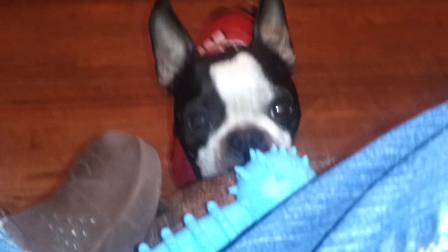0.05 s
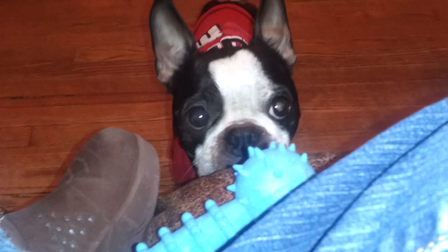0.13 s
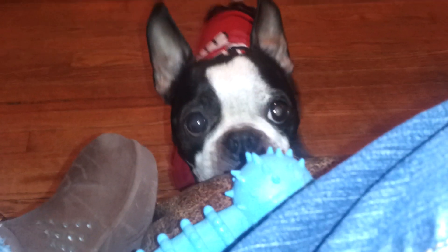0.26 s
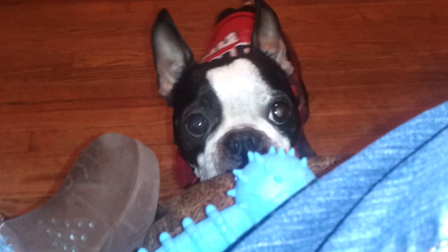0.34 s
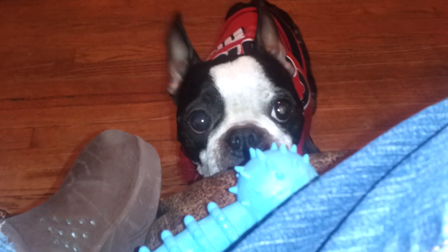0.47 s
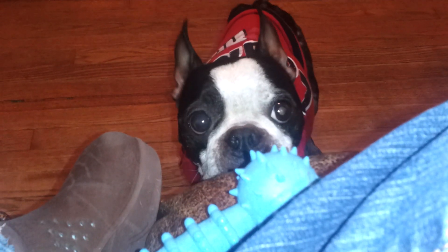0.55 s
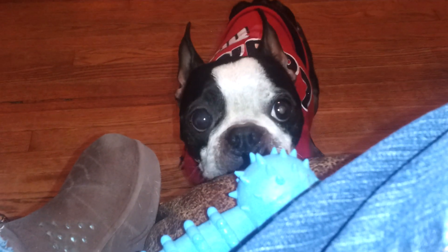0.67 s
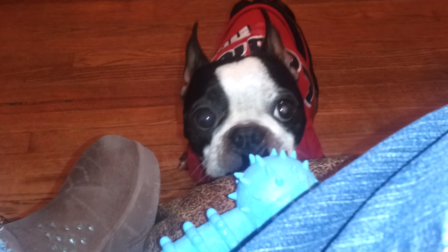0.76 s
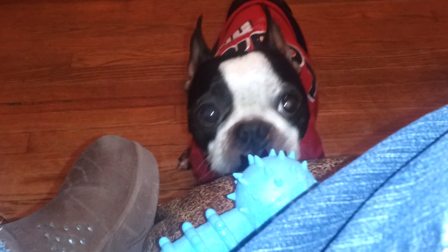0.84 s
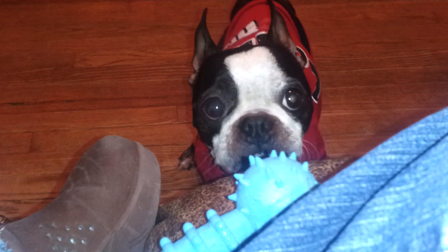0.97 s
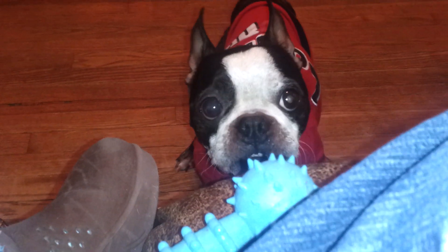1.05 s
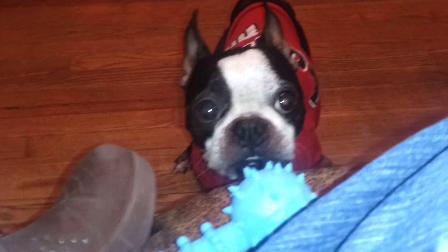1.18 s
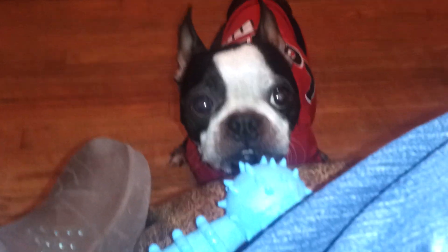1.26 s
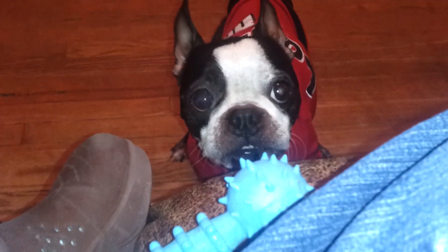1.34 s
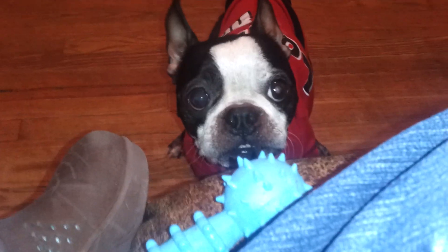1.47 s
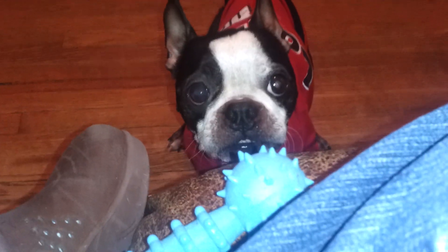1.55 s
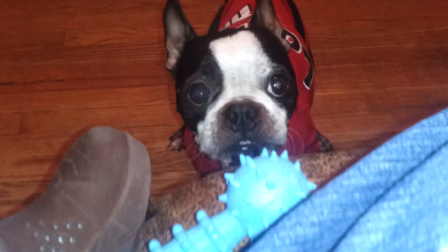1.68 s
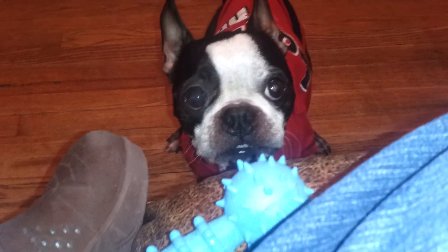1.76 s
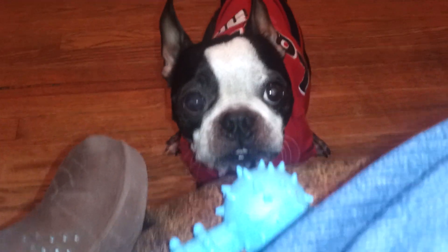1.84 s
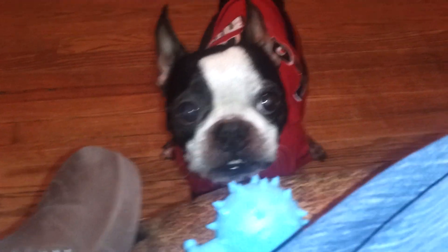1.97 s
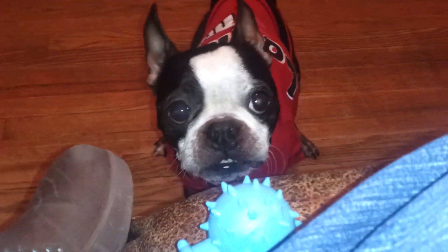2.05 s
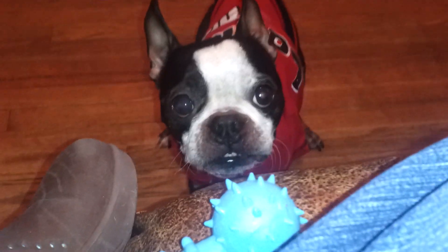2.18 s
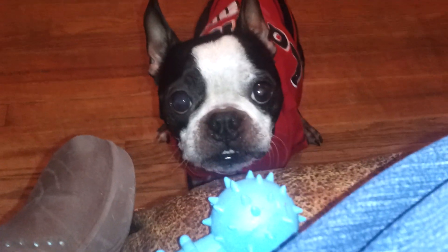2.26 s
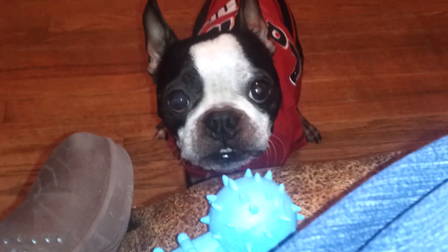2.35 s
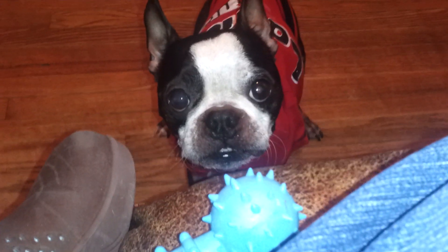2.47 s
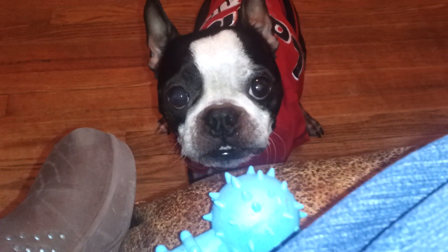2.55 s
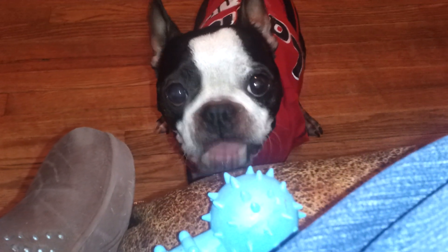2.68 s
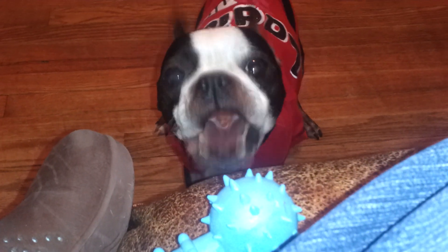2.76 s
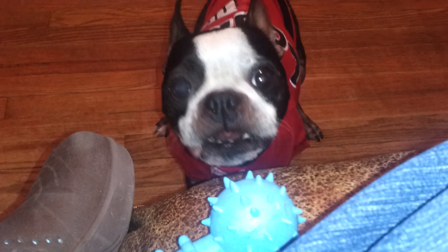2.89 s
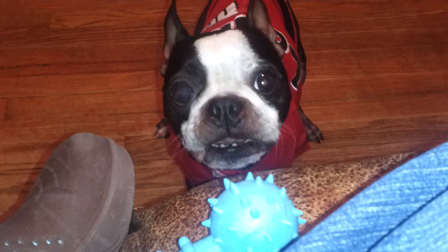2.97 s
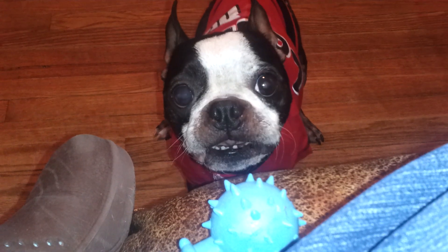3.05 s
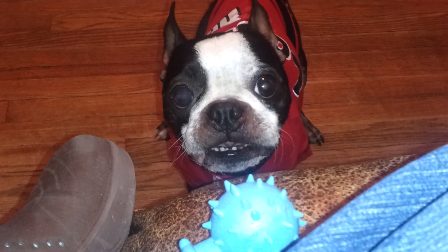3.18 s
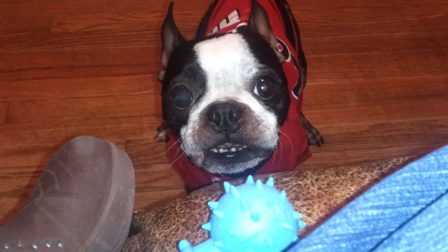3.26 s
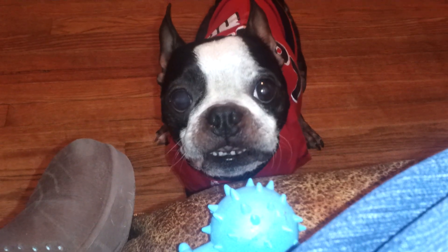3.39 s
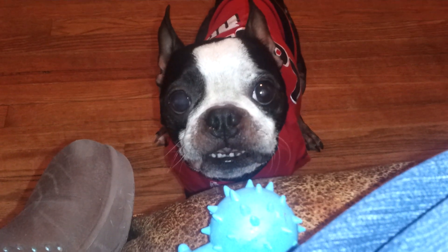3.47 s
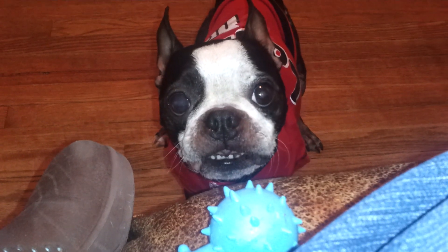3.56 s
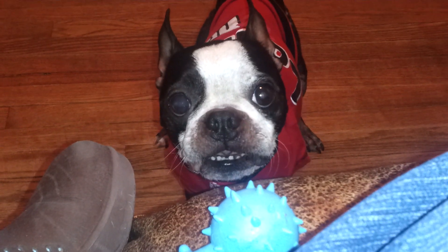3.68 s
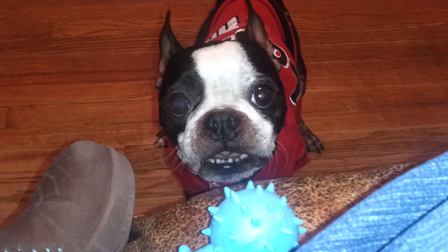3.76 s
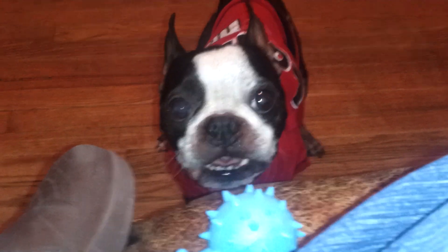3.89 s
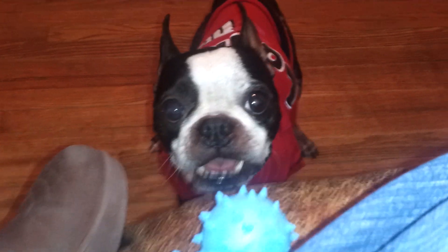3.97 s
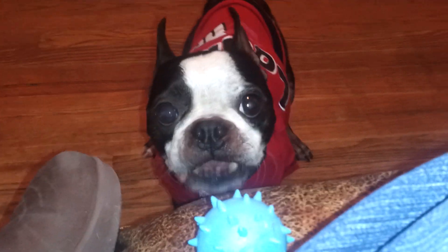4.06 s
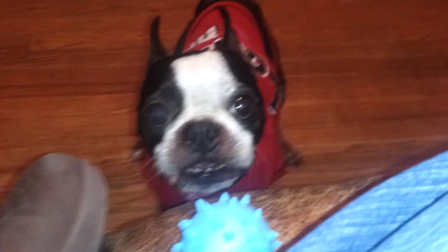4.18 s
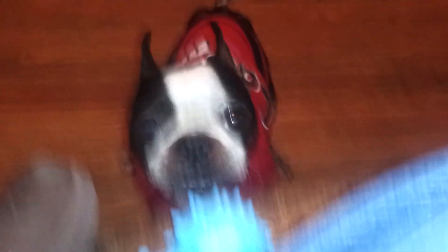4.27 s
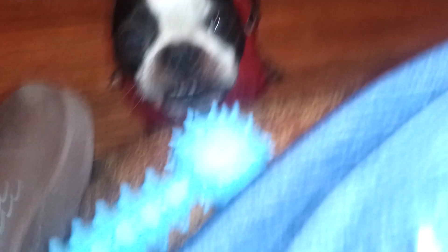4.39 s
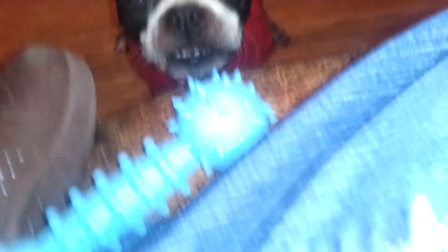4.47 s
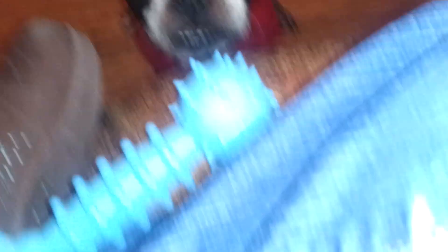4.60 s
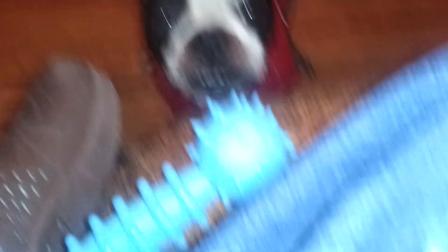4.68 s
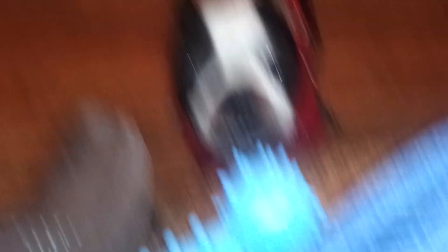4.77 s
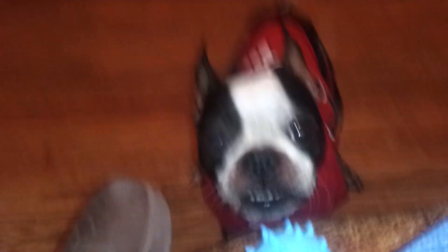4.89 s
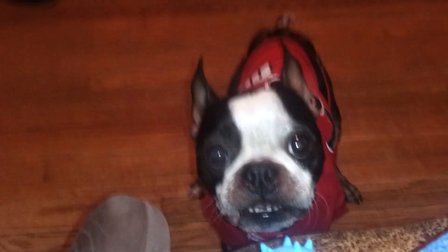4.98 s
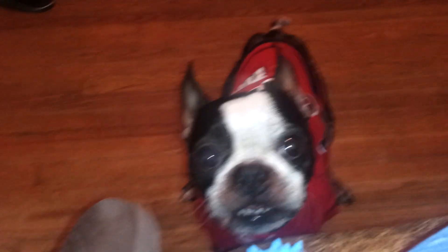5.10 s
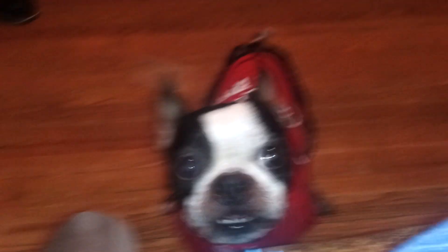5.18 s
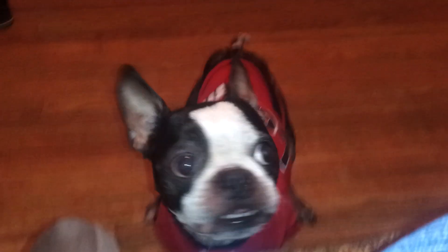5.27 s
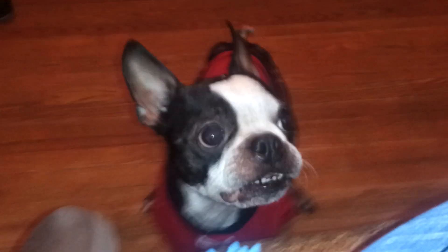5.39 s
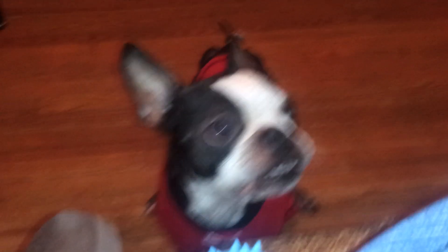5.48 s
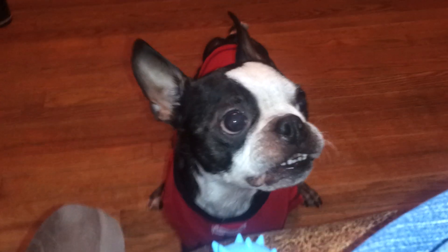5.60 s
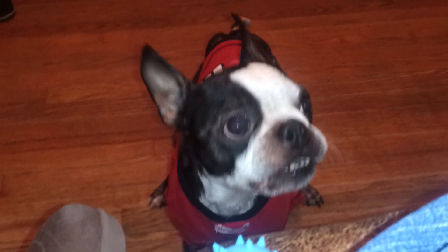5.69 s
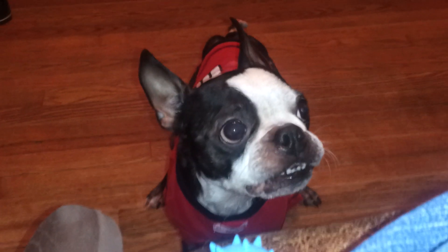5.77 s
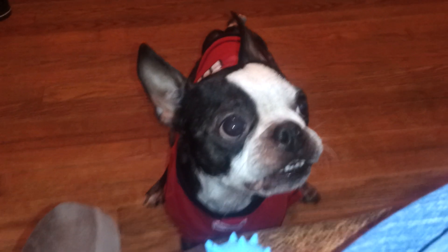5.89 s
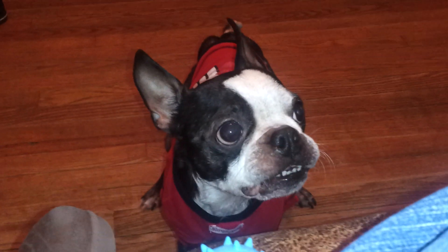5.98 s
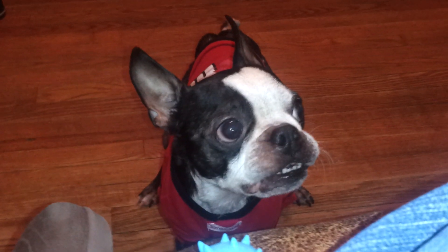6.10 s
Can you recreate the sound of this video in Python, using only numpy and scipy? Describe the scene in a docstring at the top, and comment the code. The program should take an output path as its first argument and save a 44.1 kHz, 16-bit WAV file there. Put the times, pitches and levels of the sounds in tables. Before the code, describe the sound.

Close, handheld pickup of a small flat-faced dog in a ringing hard-floored room with low room tone and hiss. A snort is already fading at 0 s, with a stronger nasal huff around 0.2. From 0.6 to 0.9 it grumbles with its mouth shut, mid-pitched, breaking into a rough croak over a thin wheeze. Small ticks and a barely audible whistle follow at 1.1-1.4, then a faint snort at 1.5. At 1.6 a very short bark runs into a yelp; a loud hoarse bark lands at 2.2 after a gasp. At 2.6 a rising swoop leads to a clipped bark, a shrill yelp and another bark at 2.8. The loudest single bark comes at 3.5. Handling thuds at 3.9 precede a brief arching whine at 4.0 and a last bark at 4.2. Peaks distort. A bump at 4.65, soft gasps to 5.0, a nearly inaudible snort at 5.3, then quiet.

```python
"""A small flat-faced dog, an arm's length from a phone in a wooden-floored room, snorts, grumbles, then barks
six times with two shrill yelps and a whine between. Its voice is vocal-fold pulses and puffed air through
throat and mouth resonances; snorts and gasps are shaped noise. A decaying noise tail makes the room ring.
Lip, claw and cloth ticks and a hand on the case lie close to the microphone, over room tone and hiss.
The barks overload the microphone."""
import sys
import numpy as np
from scipy import signal
from scipy.fft import rfft, irfft
from scipy.io import wavfile

SR = 44100
rng = np.random.default_rng(int(sys.argv[2]) if len(sys.argv) > 2 else 0)


def level_to_linear(level):
    """Convert decibel levels to linear amplitude factors, elementwise."""
    exponent = np.asarray(level, float) / 20
    return 10 ** exponent


def transcribe(u):
    """Save the signal u as a 16-bit wav file named by the first command-line argument.

    u: samples, shape (n,) or (channels, n), limited to [-1, 1]; the rate is SR.
    q: integer samples, one column per channel.
    """
    v = np.clip(np.atleast_2d(u).T, -1, 1)
    q = np.round(v * 32767).astype(np.int16)
    wavfile.write(sys.argv[1], SR, q)


N = 270774  # length in samples


def shape(x, gain):
    """Filter x by a gain given as a function of frequency."""
    return irfft(rfft(x) * gain(np.fft.rfftfreq(len(x), 1 / SR) + 1), len(x))


def unit(x):
    """Scale to rms 1."""
    return x / np.sqrt(np.mean(x ** 2))


def walk(count, rate):
    """Smooth chance that changes about rate times a second; spread 1."""
    return unit(shape(rng.standard_normal(count), lambda f: 1 / (1 + (f / rate) ** 2)))


def resonances(modes):
    """Complex gain of a row of steep resonances side by side."""
    def gain(f):
        return sum(level_to_linear(db) / (1 + 1j * (f / hz - hz / f) * hz / width) ** 2 for hz, width, db in modes)
    return gain


def voice(mouth, jitter, shimmer_db, air_db, clean_hz=3700, skip=2, skip_depth=0.):
    """Vocal-fold pulses that wobble in pitch and size, swelling every skip cycles, with air puffed once a cycle."""
    def sound(hz):
        phase = 2 * np.pi * np.cumsum(hz * (1 + jitter * walk(len(hz), 120))) / SR
        orders = np.arange(1, 12000 // hz.max())[:, None]
        # the folds close softly, so overtones above clean_hz sink under the air noise
        overtones = np.cos(orders * phase) / (1 + (orders * hz / clean_hz) ** 2)
        pulses = unit(overtones.sum(axis=0))
        pulses = pulses * (1 + skip_depth * np.cos(phase / skip))
        pulses = pulses * level_to_linear(shimmer_db * walk(len(hz), 300))
        air = rng.standard_normal(len(hz)) * (1 + .7 * np.cos(phase))
        return shape(pulses + level_to_linear(air_db) * air, resonances(mouth))
    return sound


def breath(airway):
    """Turbulent air or rubbing, with a slight flutter, through resonances."""
    def sound(t):
        flutter = level_to_linear(1.5 * walk(len(t), 40))
        return shape(rng.standard_normal(len(t)) * flutter, resonances(airway))
    return sound


def swell(start, peak, end, db, edge_db):
    """Level points that rise to a peak and fall away; edge_db is the ends' level against the peak."""
    return [(start, db + edge_db), (peak, db), (end, db + edge_db)]


RISE_S = .006  # soft start of every call
TREBLE_HZ, TREBLE_PER_DB = 1500, 0.18  # treble corner; dB of treble per dB of effort


def play(call, sound, fall_s=0.011):
    """Lay sound(pitch) out along a call's points, with soft ends; less effort dulls the treble."""
    s, *pitch, db = np.transpose(call)
    t = np.arange(N) / SR
    span = slice(int(s[0] * SR), int((s[-1] + fall_s) * SR))
    t = t[span]
    ends = np.clip((t - s[0]) / RISE_S, 0, 1) * np.clip((t[-1] - t) / fall_s, 0, 1)
    effort_db = np.interp(t, s, db)
    x = unit(sound(np.interp(t, s, pitch[0]) if pitch else t))
    if pitch:
        treble = shape(x, lambda f: 1 / (1 + (TREBLE_HZ / f) ** 6))
        x = x - treble * (1 - level_to_linear(TREBLE_PER_DB * (effort_db - db.max())))
    out = np.zeros(N)
    out[span] = x * level_to_linear(effort_db) * ends
    return out


# room tone spectrum, power density before scaling: freq_hz, density_db
HUSH_SPECTRUM = [(15, -47), (25, -13.5), (96, -2), (274, -3.5), (537, -7), (3090, -12.5), (4040, -12.5),
                 (5880, -13), (7500, -11.5), (11500, -25.5), (15500, -30)]
# slow fall of the room tone: time_s, level_db
HUSH_LEVEL = [(0, -59), (6.14, -65)]


def hush():
    """Room tone: shaped noise whose level slides along its table and wanders a little."""
    hz, db = np.transpose(HUSH_SPECTRUM)
    noise = unit(shape(rng.standard_normal(N), lambda f: level_to_linear(np.interp(np.log(f), np.log(hz), db))))
    level_db = np.interp(np.arange(N) / SR, *np.transpose(HUSH_LEVEL))
    return noise * level_to_linear(level_db + 0.9 * walk(N, 2.1))


HISS_DB, HISS_HZ = -70, 7000  # level; the hiss lies mostly above this corner


def hiss():
    """Steady microphone hiss: noise with its bass rolled off."""
    return level_to_linear(HISS_DB) * unit(shape(rng.standard_normal(N), lambda f: 1 / (1 + (HISS_HZ / f) ** 2)))


# snorts; the first one is already falling: start_s, peak_s, end_s, level_db
SNORTS = [(0., -0.018, 0.046, -36), (.14, 0.235, .37, -28), (1.44, 1.503, 1.62, -52),
          (5.14, 5.277, 5.42, -66.5)]
# nostril resonances: freq_hz, width_hz, gain_db
NOSTRILS = [(2360, 1000, -8.5), (4335, 4200, 14), (5900, 2200, 12), (8500, 1000, -9.5)]
SNORT_EDGE_DB = -28


def snorts():
    """Air roughened into noise in narrow nostrils."""
    return sum(play(swell(*row, SNORT_EDGE_DB), breath(NOSTRILS)) for row in SNORTS)


# time for each octave band to die by 60 dB: freq_hz, t60_s
ROOM_T60 = [(150, 0.36), (400, 0.05), (900, 0.34), (3000, 0.47), (6000, 0.34), (10000, 0.1), (15000, 0.033)]
ROOM_DB, ROOM_GAP_S = -4.5, 0.0021  # tail energy against the direct sound; silence before the first reflection


def room(x):
    """Dense reflections off the room as a noise tail, each band dying at its own rate."""
    t = np.arange(int(.9 * SR)) / SR
    tail = np.zeros(len(t))
    for hz, t60 in ROOM_T60:
        band = shape(rng.standard_normal(len(t)), lambda f: np.exp(-np.log2(f / hz) ** 2 / .5))
        tail += band * level_to_linear(-60 * t / t60)
    tail = tail * (t > ROOM_GAP_S) / np.sqrt(np.sum(tail ** 2))
    return level_to_linear(ROOM_DB) * signal.fftconvolve(x, tail)[:N]


# lips, claws and cloth: start_s, level_db, thud_hz, crack_db (over the thud)
TICKS = [(0.039, -40.5, 155, -8), (1.11, -47, 340, 1), (1.139, -47.5, 151, 0), (1.183, -41.5, 161, -6),
         (1.357, -53, 288, -19), (1.457, -40, 326, -1.5), (3.857, -26.5, 275, -0.5),
         (3.911, -22.5, 360, -20), (4.62, -25.5, 967, -4.5), (4.658, -44.5, 866, -4.5)]


def ticks():
    """Small contacts close to the microphone: each a noise crack on a brief, damped thud."""
    out = np.zeros(N)
    t = np.arange(800) / SR
    for s, db, hz, crack_db in TICKS:
        crack = rng.standard_normal(len(t)) * np.exp(-t / 0.0045)
        crack = shape(crack, lambda f: 1 / (1 + (f / 7000) ** 4))
        thud = np.sin(2 * np.pi * hz * t) * np.exp(-t * hz / 0.5)
        i = int(s * SR)
        out[i:i + len(t)] += level_to_linear(db) * (level_to_linear(crack_db) * crack + thud)
    return out


# wheeze under the grumble: start_s, peak_s, end_s, level_db
WHEEZE = (.58, .75, .93, -43)
# nose resonances with the mouth shut: freq_hz, width_hz, gain_db
SHUT_NOSE = [(2370, 240, 2.5), (3604, 405, -0.5), (5240, 2000, 1.5), (8320, 780, -3)]


def wheeze():
    """Turbulent air through the nose while the mouth is shut."""
    return play(swell(*WHEEZE, -15), breath(SHUT_NOSE))


def stretch(call, start, end):
    """The part of a call between two times."""
    s, hz, db = np.transpose(call)
    t = np.linspace(max(start, s[0]), min(end, s[-1]), num=40)
    return np.transpose([t, np.interp(t, s, hz), np.interp(t, s, db)])


# grumble contour: time_s, pitch_hz, level_db
GRUMBLE = [(0.582, 431, -72), (0.594, 401, -39), (0.612, 410, -36.5), (0.624, 501, -28.5),
           (0.644, 509, -31.5), (0.696, 492.3, -38), (0.712, 476, -33.5), (0.764, 477, -35.5),
           (0.78, 498, -31.5), (0.83, 420.7, -35.5), (0.886, 410.7, -44), (0.915, 352, -50)]
# throat resonances with the mouth shut: freq_hz, width_hz, gain_db
SHUT_MOUTH = [(137, 44, 9.5), (301, 54, -23), (430, 440, 6.5), (807, 370, -2.5), (1050, 91, 8.5),
              (1170, 77, -31.5)]
HALVES_S, THIRDS_S = 0.63, .777  # where the grumble breaks into halves, then thirds


def grumble():
    """Shut-mouth voice whose pulses start even, then alternate in twos, then in threes."""
    even = voice(SHUT_MOUTH, .008, 1.5, -6, clean_hz=1200)
    halves = voice(SHUT_MOUTH, .02, 3.5, 1, clean_hz=1500, skip=2, skip_depth=.8)
    thirds = voice(SHUT_MOUTH, .035, 4, 0, clean_hz=1500, skip=3, skip_depth=1.3)
    return (play(stretch(GRUMBLE, 0, HALVES_S), even)
            + play(stretch(GRUMBLE, HALVES_S, THIRDS_S), halves)
            + play(stretch(GRUMBLE, THIRDS_S, np.inf), thirds))


# rubs of the hand: start_s, peak_s, end_s, level_db
HANDLING = [(1.05, 1.188, 1.24, -69), (1.44, 1.466, 1.52, -68), (3.84, 3.871, 3.94, -41.5),
            (4.6, 4.662, 4.7, -55.5)]
# case resonances: freq_hz, width_hz, gain_db
CASE = [(90, 54, 3), (205, 200, -0.5)]
HANDLING_EDGE_DB = -10


def handling():
    """Rumble of the hand on the case: rubbing noise through low resonances."""
    return sum(play(swell(*rub, HANDLING_EDGE_DB), breath(CASE)) for rub in HANDLING)


# faint whistle: time_s, pitch_hz, level_db
WHISTLE = [(1.17, 2880, -78), (1.33, 2860, -72), (1.39, 2856, -78)]


def whistle():
    """A faint thin tone from the dog: one sine with a wobbling pitch."""
    def sound(hz):
        return np.sin(2 * np.pi * np.cumsum(hz * (1 + .012 * walk(len(hz), 60))) / SR)
    return play(WHISTLE, sound)


# quick swell to a knee, slower to the peak; level_db against the peak
BARK_ATTACK_S, BARK_KNEE, BARK_START_DB, BARK_KNEE_DB = .04, 0.75, -26.5, -5.5
BARK_RELEASE_S, BARK_END_DB = .04, -6.5
CLIMB_S, SETTLE_S = .055, .04  # pitch climbs to its top, then heads for where it settles


def bark(start, length, db, first_hz, top_hz, settled_hz):
    """Contour of one bark: swell, hold and release; short barks squeeze the swell and the climb."""
    t = np.linspace(0, length, num=60)
    attack, climb = min(BARK_ATTACK_S, .75 * length), min(CLIMB_S, .75 * length)
    effort = np.interp(t, [0, BARK_KNEE * attack, attack], [BARK_START_DB, BARK_KNEE_DB, 0])
    release = min(BARK_RELEASE_S, length - attack)
    effort = effort + BARK_END_DB * np.clip(1 - (length - t) / release, 0, 1)
    hz = np.interp(t, [0, climb, climb + SETTLE_S], [first_hz, top_hz, settled_hz])
    return np.transpose([start + t, hz, db + effort])


# barks: start_s, length_s, level_db (peak), first_hz, top_hz, settled_hz
BARKS = [(1.583, 0.056, -4, 870, 1047, 955), (2.17, 0.12, 8.5, 864.8, 995, 1011),
         (2.673, 0.041, 4.5, 859, 1050, 1050), (2.818, 0.14, 7.5, 878.8, 995.4, 905.9),
         (3.48, 0.12, 9.5, 789.5, 1026, 869.4), (4.166, 0.15, 3.5, 681, 1050, 874)]
# pitch wobble of each bark: share of pitch
BARK_JITTER = (.05, .055, .05, .036, .036, .022)
# throat and mouth resonances in a bark: freq_hz, width_hz, gain_db
BARK_MOUTH = [(960, 500, -4), (1177, 430, -4.5), (1559, 213, 3), (2710, 310, -3.5), (3017, 160, -7),
              (4360, 300, -16.5), (5770, 590, -15), (7435, 1300, -16.5)]
PUFF_RISE_S, PUFF_S, PUFF_DB, PUFF_EDGE_DB = 0.0096, 0.058, -30.5, -8.5  # PUFF_DB is against the bark


def barks():
    """Hoarse voice with strong air noise, and a puff of air bursting out as each bark opens."""
    out = np.zeros(N)
    for row, jitter in zip(BARKS, BARK_JITTER):
        start, _, db, *_ = row
        hoarse = voice(BARK_MOUTH, jitter, 4, 5, clean_hz=1300, skip=2, skip_depth=.5)
        puff = swell(start, start + PUFF_RISE_S, start + PUFF_S, db + PUFF_DB, PUFF_EDGE_DB)
        out += play(bark(*row), hoarse) + play(puff, breath(NOSTRILS))
    return out


YELP_ATTACK_S, YELP_START_DB = 0.0095, 0  # start level is against the peak


def yelp(start, length, db, hz, end_db):
    """Contour of one yelp: a steady pitch, struck fast and fading."""
    return [(start, hz, db + YELP_START_DB), (start + YELP_ATTACK_S, hz, db), (start + length, hz, db + end_db)]


# yelps: start_s, length_s, level_db (peak), pitch_hz, end_db (against the peak)
YELPS = [(1.63, 0.072, -1.5, 705.9, -20), (2.712, .083, -1, 1361, -12.5)]
# mouth resonances of the first yelp: freq_hz, width_hz, gain_db
YELP_MOUTH = [(720, 160, -13.5), (1419, 1800, -3), (2300, 1500, -4.5), (2857, 290, 4), (3438, 570, 0.5),
              (4175, 220, -9), (5500, 1400, -2.5), (8303, 2280, -6.5)]
# mouth resonances of the second, higher yelp: freq_hz, width_hz, gain_db
SHRILL_MOUTH = [(1100, 800, -9), (2580, 1100, 0.5), (4100, 290, -3), (5220, 600, -3), (7860, 2400, -15.5)]


def yelps():
    """Tense folds with little pitch wobble; the second yelp swells strongly every fourth cycle."""
    first = voice(YELP_MOUTH, .008, 2.5, 2, skip=2, skip_depth=.2)
    shrill = voice(SHRILL_MOUTH, .006, 3, -1, clean_hz=6000, skip=4, skip_depth=.9)
    return play(yelp(*YELPS[0]), first) + play(yelp(*YELPS[1]), shrill)


# gasps: start_s, peak_s, end_s, level_db
GASPS = [(1.895, 2.104, 2.16, -48), (3.25, 3.422, 3.48, -47.5), (4.723, 4.863, 4.93, -51.5),
         (4.95, 4.995, 5.04, -61.5)]
# open airway resonances: freq_hz, width_hz, gain_db
OPEN_AIRWAY = [(740, 150, -2), (1380, 250, 0.5), (1713, 110, -1.5), (3930, 600, -17), (7000, 2000, -19)]
GASP_EDGE_DB = -12.5


def gasps():
    """Turbulent air through the open airway."""
    return sum(play(swell(*row, GASP_EDGE_DB), breath(OPEN_AIRWAY)) for row in GASPS)


# rising swoop into the third bark: time_s, pitch_hz, level_db
SWOOP = [(2.622, 281.5, -43.5), (2.646, 526, -31.5), (2.658, 650, -18), (2.685, 921, -8.5)]
# mouth resonances in the swoop: freq_hz, width_hz, gain_db
SWOOP_MOUTH = [(650, 700, 0), (1250, 450, -3), (3200, 900, -26), (5500, 3000, -16)]


def swoop():
    """Voice that climbs steeply in pitch and level, with few overtones."""
    return play(SWOOP, voice(SWOOP_MOUTH, .012, 2, -8, clean_hz=900))


# whine contour: time_s, pitch_hz, level_db
WHINE = [(3.945, 364.5, -32), (3.967, 479.4, -32), (3.999, 566.4, -20.5), (4.022, 591.4, -15),
         (4.05, 607.8, -19.5), (4.1, 478, -35.5), (4.14, 367, -30)]
# mouth resonances in the whine: freq_hz, width_hz, gain_db
WHINE_MOUTH = [(520, 400, 0), (1180, 240, -1), (2600, 900, -17), (4250, 600, 2), (5000, 700, -1),
               (7600, 900, -22)]


def whine():
    """Nearly clean voice whose pitch arches up and back down."""
    return play(WHINE, voice(WHINE_MOUTH, .006, 2.5, -9, clean_hz=5000))


def dog():
    """Everything that comes from the dog, an arm's length off and without the room."""
    breaths = snorts() + wheeze() + gasps()
    calls = grumble() + whistle() + barks() + yelps() + swoop() + whine()
    return breaths + calls


def scene():
    """Dog direct and through the room, ticks and handling close by, room tone and hiss."""
    animal = dog()
    return (animal + room(animal) + ticks() + handling() + hush() + hiss())[None]


def low_pass(x):
    """Removes everything above the highest recorded frequency."""
    return signal.sosfilt(signal.butter(12, 15850, fs=SR, output="sos"), x)


OVERLOAD = 0.62  # sample value where the microphone clips
BASS_CUT_HZ, TOP_HZ = 57, 15900


def record(dry):
    """The overloaded microphone squares off the loudest peaks; filters trim bass and top."""
    x = np.clip(dry[0], -OVERLOAD, OVERLOAD)
    x = shape(x, lambda f: (1 + (BASS_CUT_HZ / f) ** 8) ** -.5)[None]
    x = signal.sosfilt(signal.butter(4, TOP_HZ, fs=SR, output="sos"), x)
    return low_pass(x)


dry = scene()
out = record(dry)
transcribe(out)
```